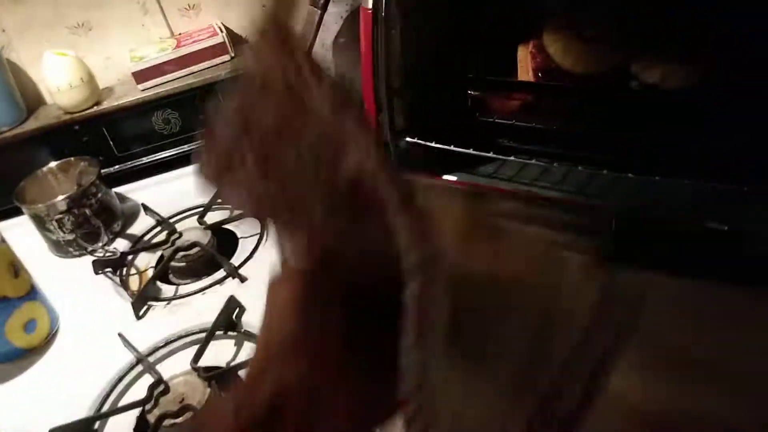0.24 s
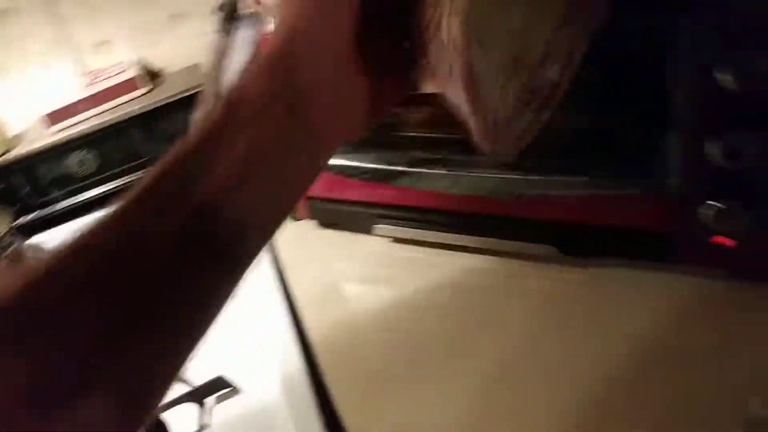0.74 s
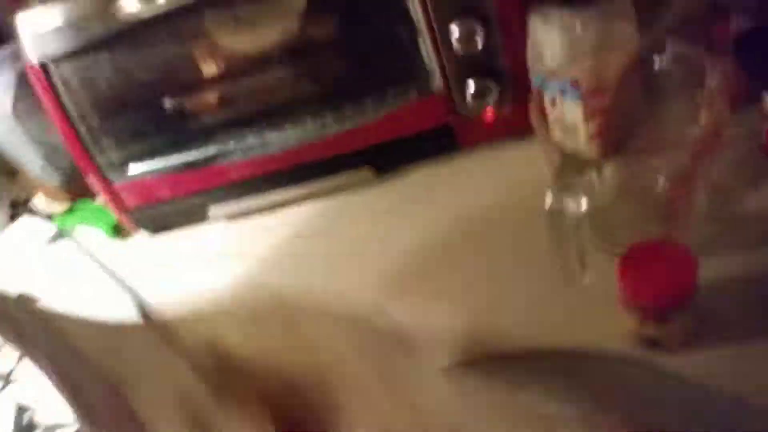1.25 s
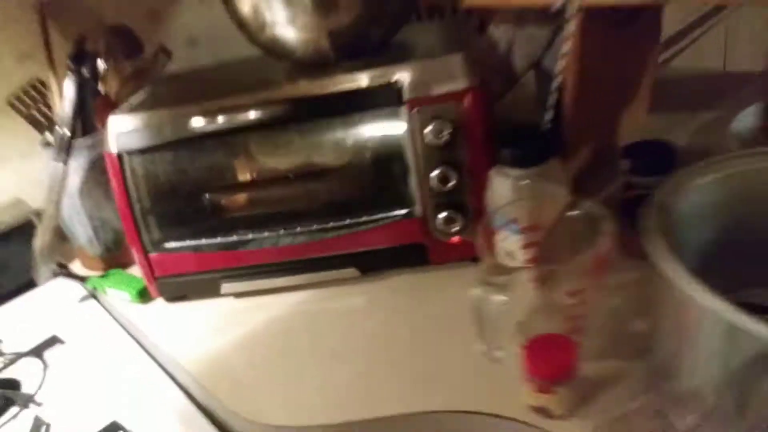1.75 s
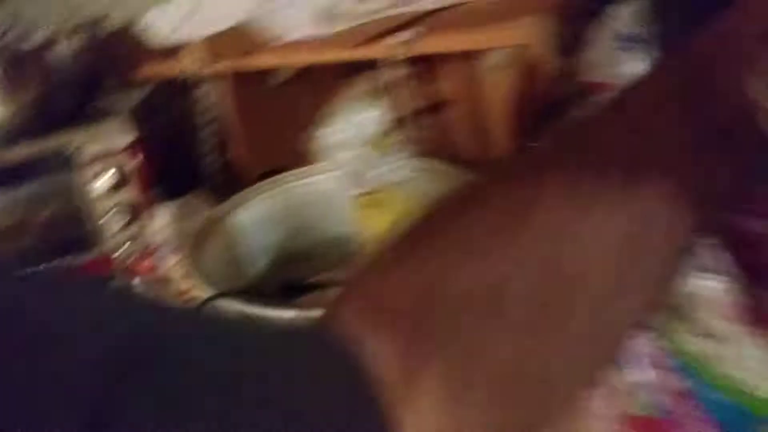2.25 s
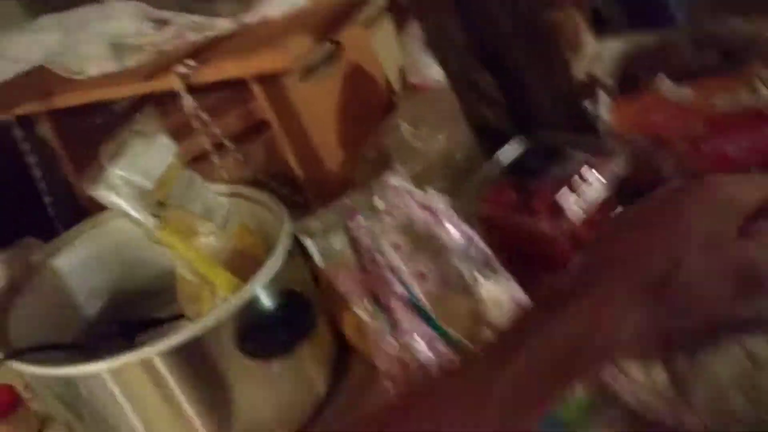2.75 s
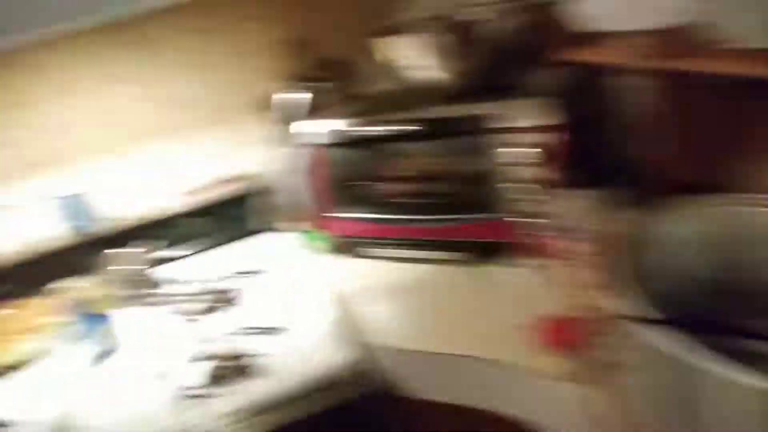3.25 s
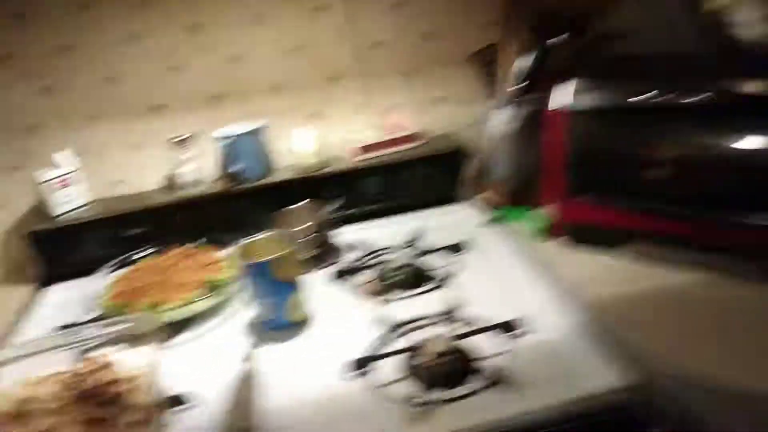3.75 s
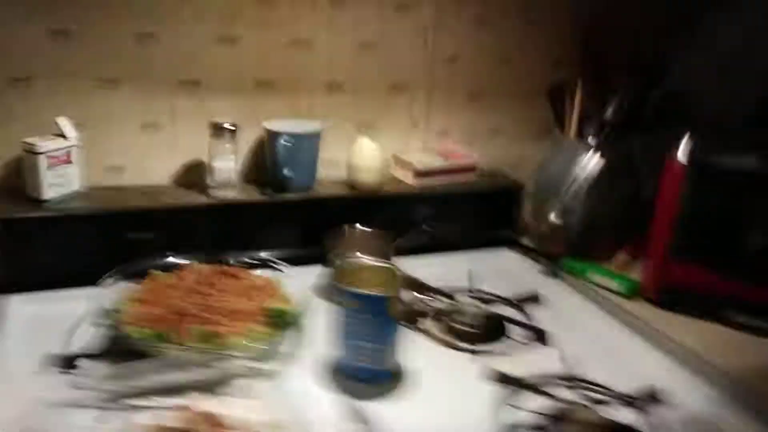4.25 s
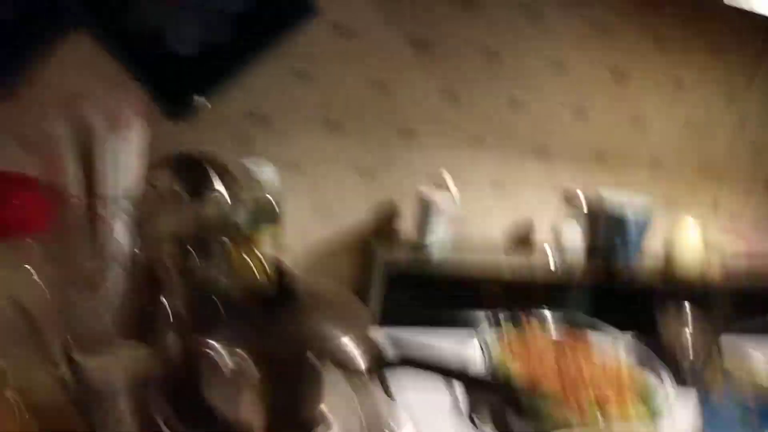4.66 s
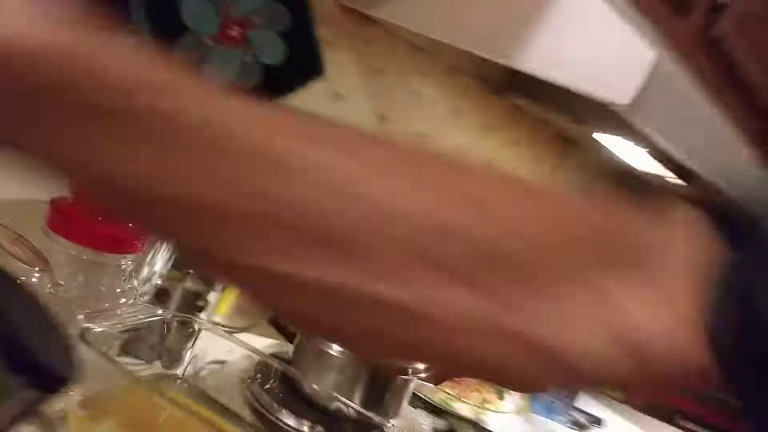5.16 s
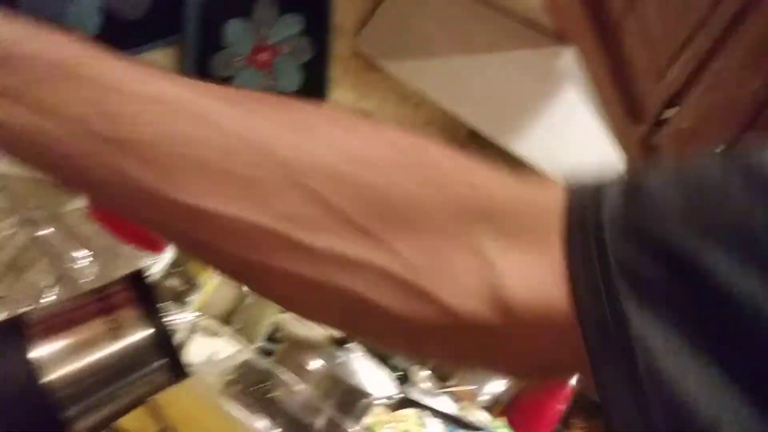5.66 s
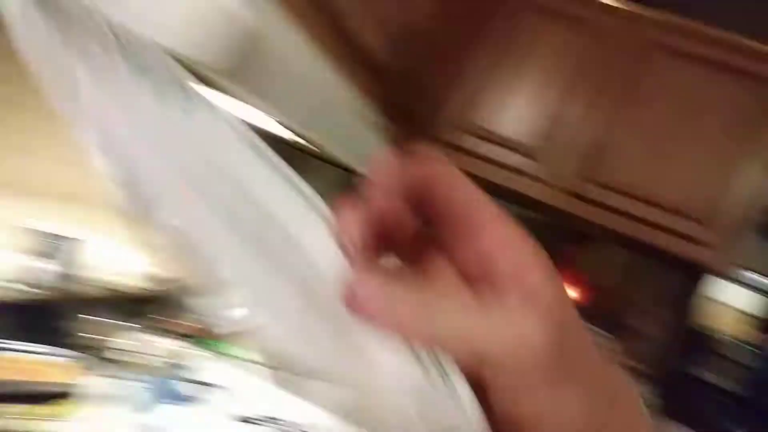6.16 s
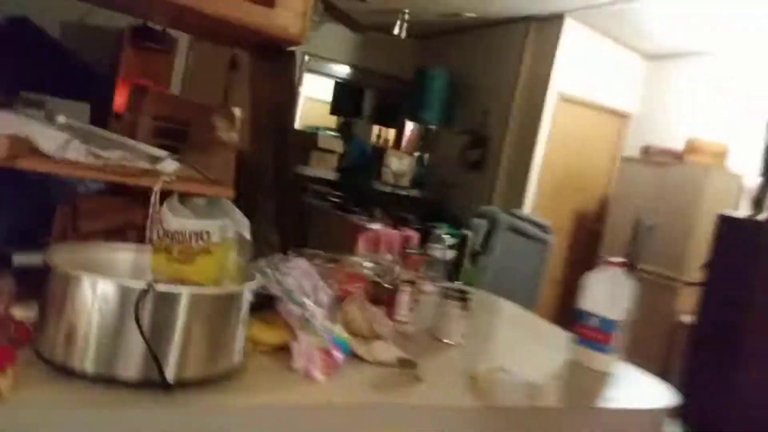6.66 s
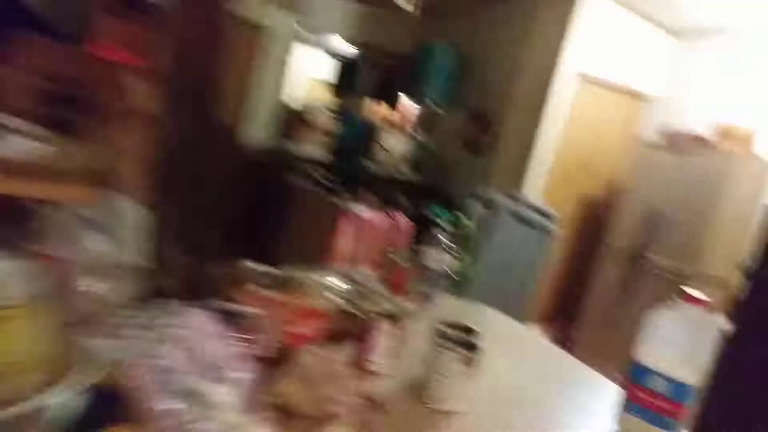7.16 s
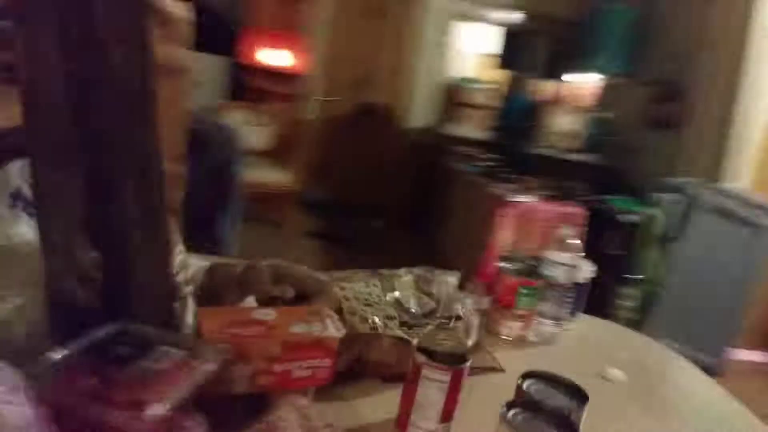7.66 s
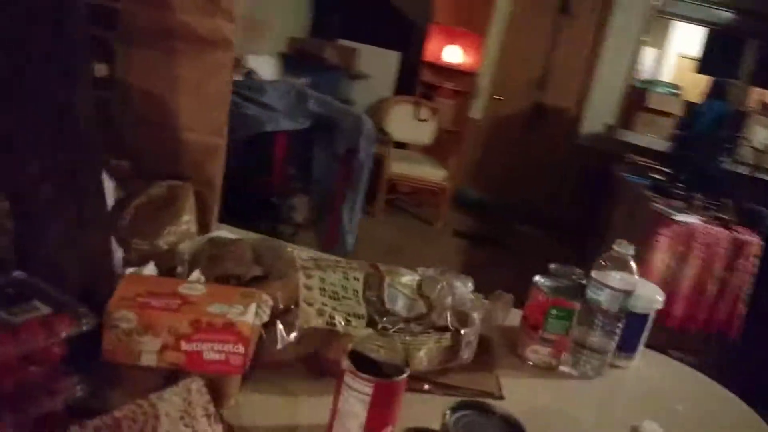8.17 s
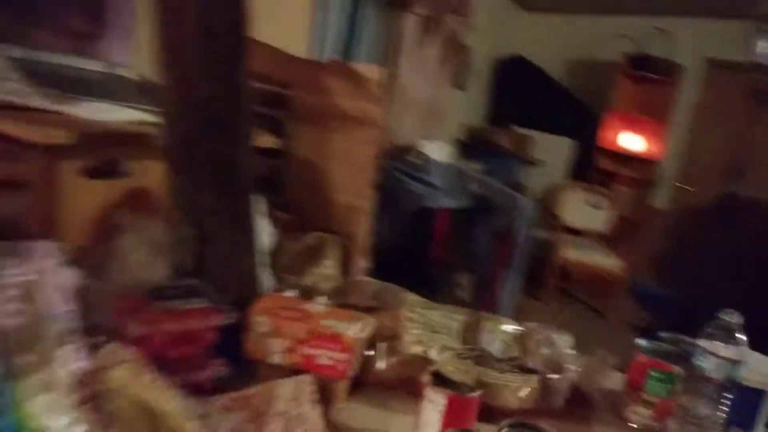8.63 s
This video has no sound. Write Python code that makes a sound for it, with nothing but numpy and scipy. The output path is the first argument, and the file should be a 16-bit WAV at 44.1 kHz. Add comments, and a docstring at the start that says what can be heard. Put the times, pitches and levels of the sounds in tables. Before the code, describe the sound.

A pan scrapes an oven rack, the metal door squeaks and slams, a timer ticks, then a plate is lifted, set down hard and rocks to rest.

```python
"""A small kitchen, heard from a hand-held phone: noise bursts, fading sine modes and a diffuse room echo.
A pan scrapes on a toaster oven's rack, the door squeaks and slams, and the clockwork timer beats in clicks.
Things knock on the counter and two faint low footsteps fall; a plate is slid off a stack, set down hard
and rocks to rest in rows of contacts. Tiny random clicks make the slide, the cloth brushing the phone
and a tap that starts to hiss near the end."""
import sys
import numpy as np
from scipy import signal
from scipy.fft import rfft, irfft
from scipy.io import wavfile

SR = 44100
rng = np.random.default_rng(int(sys.argv[2]) if len(sys.argv) > 2 else 0)


def output_pcm(signal):
    """Save a mono or channel-first signal as 16-bit PCM at the path in sys.argv[1].

    Samples are clipped to [-1, 1] before scaling.
    """
    pcm = np.clip(np.atleast_2d(signal).T, -1, 1) * 32767
    wavfile.write(sys.argv[1], SR, np.round(pcm).astype(np.int16))


N = 392490
TIME = np.arange(N) / SR

# Contacts. Each row: start in seconds, relative level in dB, brightness in dB per octave, decay t60 in seconds.
# The pan bumps onto the oven rack.
PAN_BUMPS = [(.1995, -33.5, -1.5, .06), (.205, -29.5, -7, .06), (.2295, -29, 0, .075), (.238, -35, .5, .05),
             (.27, -35, -2, .04)]
# The oven door slams (one row).
DOOR_SLAM = (.8073, -8.3, .5, .058)
# The plate meets the stack as it is lifted off.
STACK_BLOWS = [(5.4835, -45, -1.5, .033), (5.503, -35.5, 1, .21), (5.5622, -18, 2.5, .065),
               (5.6595, -17, 1.3, .095), (5.781, -48, 0, .03), (5.918, -55, 1, .02), (5.929, -50, 1, .011),
               (6.081, -55, 1, .016)]
# The plate lands flat (one row).
LANDING = (7.815, -9.3, .3, .036)
# It comes down again after its first hop (one row).
FIRST_REBOUND = (7.8495, -16.3, 0, .06)
# Its last rock, which runs out in ever quicker bounces (one row).
LAST_ROCK = (8.501, -13.5, -1.5, .105)
# Hard knocks on the counter.
KNOCKS = [(2.433, -51.5, 7.5, .015), (2.574, -20.5, -.5, .033), (2.589, -29.5, 2.5, .041),
          (2.602, -32, -2, .085), (7.017, -54, -10, .051)]
# Soft thumps: two faint low footsteps, then soft bumps on the counter.
THUMPS = [(4.44, -66, -8, 0.11), (4.85, -60, -12, 0.075), (5.096, -40, 1.5, 0.14),
          (8.85, -37.5, -7.5, 0.054), (8.87, -25, -5, 0.06), (8.884, -27.5, -5, 0.014)]
# The timer as the phone moves about the room, crisp when near and smeared when far; beats read between rows.
TIMER_HEARD = [(0, -35, -1, .09), (1.1, -36.5, -2, .08), (1.4, -43, -2, .11), (2.2, -49.5, -2, .19),
               (3, -49, -.5, .16), (3.8, -44.5, 0, .15), (4.7, -47, 2, .17), (5.05, -53.5, 4, .14),
               (6, -58, 3, .12), (6.8, -52.5, 4, .12), (7.6, -56, 2, .12)]

# Contacts. Each row: start in seconds, relative level in dB, brightness in dB per octave.
# Light pings of the plate's rim, and one short singing tone as it slides (the third row).
RIM_PINGS = [(5.4835, -39, -4.5), (5.503, -42, 1), (5.628, -39.5, -12), (6.335, -63, 1), (6.365, -61, 2),
             (6.39, -57.5, 2)]
# The plate rocks from rim to rim.
ROCKS = [(8.101, -28, -5), (8.1095, -13, -.2), (8.1865, -20.5, -2), (8.1935, -16, -1), (8.249, -24, 3),
         (8.2625, -15.5, -3.5), (8.3325, -14.5, -1), (8.3905, -18.5, -1.5), (8.453, -11.5, -1)]
# A jar touches down.
JAR_THUDS = [(2.53, -31.5, 4)]
# Contacts of every rock, as the rim drops and chatters.
# Each row: nominal lag in seconds, added level in dB, added brightness in dB per octave.
ROCK_CHATTER = [(0, 0, 0), (.007, -5.5, -2), (.025, -9, -2)]

# Clear ringing modes. Each row: frequency in Hz, relative level in dB, decay t60 in seconds.
# Sheet metal of the oven and pan.
OVEN_MODES = [(228, -13, 1.1), (296, -9, 1.9), (425, -6, .6), (592, -11, 1.7), (888, -11, 1.6),
              (964, -7, .9), (1540, -9, .8), (1685, -13, 1.0), (1790, -8, .6), (1970, -11, 1.2),
              (2180, -4, .9), (2250, 0, 1.3), (2300, -4, .5), (2390, -10, 1.1), (2506, -5, .5),
              (2659, -13, 1.0), (2988, -14, .9), (4042, -10, .5), (4678, -14, .8)]
# The plate held in the hand.
HELD_PLATE_MODES = [(458, -5, .12), (565, -5, .13), (790, -6, .13), (996, -7, .16), (1130, -7, .1),
                    (1985, -4, .15), (2740, -14, .1), (3413, 0, .15), (4576, -8, .08), (4710, -3, .08),
                    (5230, -5, .07), (5580, -1, .07), (5814, -3, .09), (6240, -4, .08), (6770, -6, .09),
                    (7090, -3, .06), (7870, -8, .08), (8210, -9, .08), (9100, -8, .06), (10170, -12, .07),
                    (12220, -16, .07)]
# The rim of the lifted plate.
RIM_MODES = [(2000, -2, .14), (3430, -1, .13), (4400, -5, .08), (5100, -6, .08), (5950, -2, .1),
             (6320, -5, .14), (6800, -4, .14), (9000, -7, .1), (10300, -13, .08)]
# The plate as it lands flat.
LANDED_PLATE_MODES = [(520, -6, .2), (585, -5, .25), (646, -11, .35), (904, -7, .3), (942, -7, .25),
                      (1050, 1, .22), (1147, -4, .25), (1287, -4, .3), (1550, -5, .22), (1620, -9, .25),
                      (1787, -2, .24), (1873, -6, .22), (1980, -1, .24), (2094, -9, .25), (3386, -14, .18),
                      (3440, -11, .17), (4221, -24, .25), (5545, -22, .25), (5825, -16, .27),
                      (6277, -27, .3), (6799, -17, .17), (8285, -32, .25), (9050, -30, .12),
                      (10800, -32, .09)]
# The plate as it rocks.
ROCKING_MODES = [(463, -4, .15), (545, -5, .15), (606, 0, .2), (668, -1, .2), (797, -4, .17),
                 (840, -3, .17), (1071, -6, .17), (1200, -5, .16), (1287, -18, 1.2), (1700, -9, .15),
                 (2094, -4, .26), (3300, -11, .09), (3700, -8, .1), (5880, -3, .09), (6020, -3, .08),
                 (6325, -5, .1), (6799, -5, .11), (7930, -16, .1), (8290, -20, .08), (9070, -15, .11),
                 (9650, -22, .07), (10200, -15, .08), (10800, -25, .08), (12300, -22, .07),
                 (12600, -21, .07), (13000, -25, .07)]
# The worktop under a knock.
COUNTER_MODES = [(560, -7, .05), (930, -6, .05), (1520, -3, .06), (1760, -3, .07), (2290, 0, .11),
                 (2430, -8, .06)]
# The hollow jar.
JAR_MODES = [(410, -5, 0.04), (485, 1, 0.085), (624, -9, .05), (960, -11, 0.026), (1630, -21, 0.03),
             (2000, -21, .025)]
# The timer's ticking parts.
TICK_MODES = [(3220, -9, .04), (4450, -4.5, .05), (4870, -1, 0.061), (5280, -2.5, 0.044),
              (6500, -11.5, 0.024), (7100, -15, .04)]

# Colours of crowded, quickly damped modes and of steady sounds. Each row: frequency in Hz, relative level in dB.
# Oven and pan blows.
OVEN_COLOUR = [(35, -79), (60, -53.5), (294, -8), (363, -7), (408, -4), (448, -9.5), (715, -6.5),
               (903, -11), (1010, -5), (1380, -9), (1470, -2), (2520, -2.5), (3500, -12), (5090, -7),
               (16000, -53)]
# Pan scraping on the rack.
RACK_COLOUR = [(60, -64.5), (150, -26), (250, 3.5), (340, 2), (450, -14.5), (1150, -14.5), (1950, 4),
               (2600, 4), (3500, -18.5), (4300, -4), (5600, -1.5), (7500, -14.5), (16000, -43)]
# Plate against the stack, both clinks and grit.
STACK_COLOUR = [(35, -77), (60, -53.5), (408, -39.5), (448, -3), (492, 5), (540, -4.5), (1110, .5),
                (1250, -8), (1950, -5.5), (2140, -11), (4220, -8.5), (4640, -3), (10000, -22), (16000, -33)]
# Plate landing.
LANDING_COLOUR = [(35, -90), (60, -50), (363, -15), (417, -15.5), (458, -13), (579, -4.5), (767, -10),
                  (1040, -1.5), (2000, -8.5), (2900, -24), (3420, -18.5), (4860, -31), (6900, -26),
                  (7400, -40), (16000, -71)]
# Plate rocking.
ROCKING_COLOUR = [(35, -87.5), (60, -77), (250, -25.5), (287, -27.5), (371, -14), (593, -2.5),
                  (1820, -11.5), (2140, -13), (2650, -23.5), (3760, -15.5), (5460, -23), (6000, -13),
                  (7400, -38), (9350, -45), (16000, -68)]
# Counter knocks.
KNOCK_COLOUR = [(47, -72), (80, -47), (515, -11.5), (1000, -9), (1310, -18), (1430, -3), (1740, -13),
                (1900, -19), (2270, -8), (2840, -21), (4940, -27.5), (9400, -47.5), (16000, -55)]
# Footsteps and soft bumps.
THUMP_COLOUR = [(35, -85), (70, -35), (150, -22), (250, -3), (500, 0), (1000, 1), (1500, -16), (2200, -31),
                (5000, -36.5), (15000, -49)]
# Timer beats.
TICK_COLOUR = [(60, -68), (300, -32), (900, -17.5), (2200, -5.5), (3800, -9.5), (4800, 0), (5600, -3.5),
               (7500, -18.5), (10000, -25), (15000, -31.5)]
# Tap spray.
TAP_COLOUR = [(59, -84), (100, -52), (206, -18.5), (547, -16), (621, 2), (705, -18), (752, -4.5),
              (1170, -4), (1250, 2), (1550, -5.5), (2270, -2), (3470, -10), (5650, -4), (16000, -36.5)]
# Cloth brushing past.
SLEEVE_COLOUR = [(60, -52), (200, -9), (1000, 0), (3000, -2.5), (5500, -1.5), (8000, -9.5), (15000, -25)]
# Room air.
AIR_COLOUR = [(24, -57), (40, -35), (176, -20), (209, -3.5), (262, -6), (283, -12.5), (372, 3), (663, 0.5),
              (990, 1.5), (1120, -1), (2050, -4.5), (3140, -15), (4570, -13), (6170, -20), (16000, -32)]

# Friction and flow. Each row: start, attack, hold and release t60 in seconds, gain in dB.
# Pan on the rack (one row).
RACK_SCRAPE = (.226, .006, .016, .4, -33.5)
# Door hinge (one row).
HINGE_SQUEAK = (.724, .008, .025, .35, -49)
# Plate over the plate below (one row).
PLATE_SLIDE = (5.49, .02, .18, .17, -45)
# Tap (one row).
TAP_FLOW = (8.4, .23, .18, 1.5, -39.3)
# Cloth past the phone.
SLEEVE_RUSTLES = [(2.08, .09, .29, .2, -64.5), (4.62, .1, .09, .25, -53.5)]
# Room air. Each row: time in seconds, level of the low band in dB, level of the hiss in dB.
AIR = [(0, -61.5, -62.5), (1.5, -61, -64), (2.3, -62.5, -61), (2.85, -64, -66), (3.9, -60.5, -60.5),
       (5.4, -61, -67), (6.2, -63.5, -67), (7.7, -59, -63), (8.9, -58, -66)]

OVEN_RING_DB = -30.5  # clear modes against the blows
RACK_JUDDER_DB = 3.5  # unevenness of the scrape
SQUEAK_HZ, SQUEAK_WAVER = 3310, .02  # centre pitch; random share of it
ROCK_T60_S, CHATTER_SPREAD = .07, .12  # decay of a contact; share by which its lag varies from rock to rock
FIRST_TICK_S, TICK_TOCK_S, TOCK_LAG_S = .1160, .5124, .2515  # first beat, one tick-tock, tock after tick
TOCK_DB = -1  # the tock against the tick
HUM_HZ, HUM_DB = 296, -78  # hum pitch; level about which it wanders
AIR_WAVER_DB = .7
CEILING, TOP_HZ = .72, 16000  # the phone's peak limit and upper cutoff


def oven(shimmer_db=-28, shimmer_t60=1.6, crack=6, size=62000):
    """Sheet-metal door and pan: clattering blows, a dense ringing tail, the scrape on the rack and the hinge."""
    slam = bounces(DOOR_SLAM, gap_s=.0187, loss_db=3.8, keep=.8, dulling_db=.1, count=5)
    hits = PAN_BUMPS + slam
    clatter = blows(hits, OVEN_COLOUR, crack) + rings(hits, OVEN_MODES, OVEN_RING_DB, size=size)
    panels = rng.standard_normal(size) * fade(np.arange(size) / SR, shimmer_t60)
    panels /= np.sqrt(np.sum(panels ** 2))
    shimmer = undb(shimmer_db) * signal.oaconvolve(clatter, panels)[:N]
    rubbing = unit(shape(slips(rate=2300, spread_db=3), RACK_COLOUR))
    scrape = rubbing * undb(RACK_JUDDER_DB * walk(160)) * swell(*RACK_SCRAPE)
    return clatter + shimmer + scrape + hinge(SQUEAK_HZ, SQUEAK_WAVER)


def hinge(pitch_hz, waver):
    """A thin stick-slip squeak: one sine of unsteady pitch and level."""
    phase = 2 * np.pi * np.cumsum(pitch_hz * (1 + waver * walk(700))) / SR
    return unit(np.sin(phase) * undb(3 * walk(150))) * swell(*HINGE_SQUEAK)


def plate_landing(ring_db=-8.5, body_db=0, crack=14):
    """The plate lands flat and chatters on the hard surface in ever shorter hops."""
    hits = [LANDING] + bounces(FIRST_REBOUND, gap_s=.021, loss_db=2.6, keep=.7, dulling_db=-.3, count=5)
    return undb(body_db) * blows(hits, LANDING_COLOUR, crack) + rings(hits, LANDED_PLATE_MODES, ring_db)


def plate_rocking(ring_db=-9, body_db=-1.2, crack=9):
    """Let go, it rocks from rim to rim, each rock a few contacts, and runs out in quickening bounces."""
    stretch = 1 + CHATTER_SPREAD * rng.standard_normal((len(ROCKS), len(ROCK_CHATTER)))
    hits = []
    for (s, db, tilt), lag_shares in zip(ROCKS, stretch):
        for (lag, softer, duller), share in zip(ROCK_CHATTER, lag_shares):
            hits.append((s + lag * share, db + softer, tilt + duller, ROCK_T60_S))
    hits += bounces(LAST_ROCK, gap_s=.027, loss_db=1.9, keep=.8, dulling_db=.4, count=6)
    body = undb(body_db) * blows(hits, ROCKING_COLOUR, crack)
    return body + rings(hits, ROCKING_MODES, ring_db, size=26000)


def plate_lifted(ring_db=-6.5, body_db=-2.3, crack=6, grit_db=-4, rim_db=0, size=8000):
    """The plate slides over the one below, singing in its modes, clinks against it, and its rim pings faintly."""
    body = undb(body_db) * blows(STACK_BLOWS, STACK_COLOUR, crack)
    clinks = body + rings(STACK_BLOWS, HELD_PLATE_MODES, ring_db)
    grit = slips(rate=1900, spread_db=3)
    plate_response = partials(HELD_PLATE_MODES, np.arange(size) / SR).sum(axis=0)
    singing = signal.oaconvolve(grit, plate_response)[:N]
    rubbing = undb(grit_db) * unit(shape(grit, STACK_COLOUR))
    slide = (unit(singing) + rubbing) * swell(*PLATE_SLIDE)
    return clinks + radiate(slide) + rings(RIM_PINGS, RIM_MODES, rim_db)


def counter_and_footsteps(ring_db=-9.5, jar_db=-.5):
    """Knocks ring the worktop; footsteps and soft bumps are damped thumps; a hollow jar is heard by its modes."""
    knocks = blows(KNOCKS, KNOCK_COLOUR, crack=8) + rings(KNOCKS, COUNTER_MODES, ring_db)
    thumps = blows(THUMPS, THUMP_COLOUR, crack=7.5)
    return knocks + thumps + rings(JAR_THUDS, JAR_MODES, jar_db)


def timer(level_db=-2, ring_db=-6, count=15):
    """The escapement of the oven timer, about four beats a second: a tick, then a slightly softer tock."""
    s, db, tilt, t60 = np.transpose(TIMER_HEARD)
    hits = []
    for k in range(count):
        for lag, accent_db in ((0, 0), (TOCK_LAG_S, TOCK_DB)):
            at = FIRST_TICK_S + k * TICK_TOCK_S + lag
            hits.append((at, np.interp(at, s, db) + accent_db, np.interp(at, s, tilt), np.interp(at, s, t60)))
    clicks = undb(level_db) * blows(hits, TICK_COLOUR, crack=2)
    return clicks + rings(hits, TICK_MODES, ring_db, size=4000)


def tap():
    """A fine spray of countless drops, each a tiny click."""
    return unit(shape(slips(rate=18000, spread_db=-1.5), TAP_COLOUR)) * swell(*TAP_FLOW)


def sleeve():
    """Cloth brushes past the phone: dense small slips, swelling and dying away."""
    cloth = unit(shape(slips(rate=3100, spread_db=2), SLEEVE_COLOUR))
    return cloth * sum(swell(*rustle) for rustle in SLEEVE_RUSTLES)


def air(split_hz=2500):
    """Room noise whose hiss changes as the phone turns; a faint appliance hum wanders with the standing waves."""
    s, level_db, hiss_db = np.transpose(AIR)
    noise = shape(rng.standard_normal(N), AIR_COLOUR)
    out = undb(HUM_DB + 3.5 * walk(1.5)) * unit(np.sin(2 * np.pi * HUM_HZ * TIME))
    for side, db in (("low", level_db), ("high", hiss_db)):
        band = signal.sosfilt(signal.butter(3, split_hz, side, fs=SR, output="sos"), noise)
        out = out + unit(band) * undb(np.interp(TIME, s, db) + AIR_WAVER_DB * walk(14))
    return out


def kitchen(x, low_t60=0.44, mid_t60=0.35, high_t60=0.22, build_s=0.011, size=30000):
    """Diffuse echo of cupboards and walls: noise that builds up and decays; the treble dies first."""
    t = np.arange(size) / SR
    hz = np.arange(size // 2 + 1) * SR / size
    noise, response = rfft(rng.standard_normal(size)), 0
    for lo, hi, t60 in ((0, 600, low_t60), (595, 4000, mid_t60), (3870, SR, high_t60)):
        response = response + irfft(noise * (hz >= lo) * (hz < hi)) * fade(t, t60)
    response *= np.minimum(t / build_s, 1) ** 2
    return signal.oaconvolve(x, response / np.sqrt(np.sum(response ** 2)))[:N]


def blows(table, colour, crack, size=12000):
    """Each contact gives a crack and a burst of crowded modes that die quickly."""
    out, t = np.zeros(N), np.arange(size) / SR
    for s, db, tilt, t60 in table:
        burst = rng.standard_normal(size) * fade(t, t60)
        burst[0] += crack
        add(out, s, undb(db) * attack_unit(shape(burst, colour, tilt)))
    return out


def rings(table, modes, ring_db, size=14000):
    """Contacts ring the clear modes; each meets another spot, so their mix and tuning shift a little."""
    out, t = np.zeros(N), np.arange(size) / SR
    hz, _, t60 = np.transpose(modes)
    give = .0007 / t60  # the modes that the support damps most are also detuned most by it
    ending = np.minimum(4 * (1 - t / t[-1]), 1)  # the last quarter ramps to silence
    for s, db, tilt, *_ in table:
        side, level, tuning = rng.standard_normal((3, len(modes)))
        spot = np.sign(side) * undb(2.5 * level + tilt * np.log2(hz / 1500))
        ringing = spot @ partials(modes, t, (give * tuning)[:, None])
        add(out, s, undb(db + ring_db) * attack_unit(ringing) * ending)
    return radiate(out)


def bounces(blow, gap_s, loss_db, keep=1, dulling_db=0, count=2):
    """A blow and its rebounds: each is weaker, its tilt shifts, and each gap keeps a share of the one before."""
    s, db, tilt, t60 = blow
    hits = []
    for k in range(count):
        at = s + gap_s * np.sum(keep ** np.arange(k))
        hits.append((at, db - k * loss_db, tilt - k * dulling_db, t60))
    return hits


def slips(rate, spread_db):
    """Tiny random clicks of uneven size, at a mean rate per second."""
    clicks = (rng.random(N) < rate / SR) * rng.standard_normal(N)
    return unit(clicks * undb(spread_db * rng.standard_normal(N)))


def partials(modes, t, detune=0):
    """One fading sine for each mode."""
    hz, db, t60 = np.transpose(modes)[:, :, None]
    return undb(db) * np.sin(2 * np.pi * hz * (1 + detune) * t) * fade(t, t60)


def shape(x, colour, tilt=0, size=2048):
    """Causal minimum-phase filter with a (Hz, dB) colour, tilted in dB per octave about 1.5 kHz."""
    hz, db = np.transpose(colour)
    octave = np.log2(np.maximum(np.arange(size // 2 + 1) * SR / size, 20))
    gain_db = np.interp(octave, np.log2(hz), db) + tilt * np.clip(octave - np.log2(1500), -3, 3)
    # Folding the cepstrum forward puts the filter's energy as early as it can be.
    cepstrum = irfft(np.log(undb(gain_db)))
    cepstrum[1:size // 2] *= 2
    cepstrum[size // 2 + 1:] = 0
    return signal.oaconvolve(x, irfft(np.exp(rfft(cepstrum))))[:len(x)]


def radiate(x):
    """Small things give off almost no bass: a high-pass at 200 Hz."""
    return signal.sosfilt(signal.butter(4, 200, "high", fs=SR, output="sos"), x)


def swell(start_s, attack_s, hold_s, release_s, db):
    """Gain that rises, holds and dies away."""
    t = TIME - start_s
    return undb(db) * np.clip(t / attack_s, 0, 1) * fade(np.maximum(t - attack_s - hold_s, 0), release_s)


def fade(t, t60):
    """Exponential decay, 60 dB in t60 seconds (at least 2 ms)."""
    return np.exp(-np.log(1000) * t / np.maximum(t60, .002))


def walk(rate):
    """Random values with a spread near 1, joined by straight lines, at a rate per second."""
    steps = rng.standard_normal(N // 64)
    return np.interp(TIME * rate, np.arange(len(steps)), steps)


def undb(db):
    """Decibels to gain."""
    return 10 ** (np.asarray(db) / 20)


def unit(x):
    """Scale to rms 1."""
    return x / np.sqrt(np.mean(x ** 2))


def attack_unit(x):
    """Scale to rms 1 over the first 6 ms."""
    return x / np.sqrt(np.mean(x[:int(.006 * SR)] ** 2))


def add(track, start_s, sound):
    """Mix a sound into a track."""
    i = int(start_s * SR)
    track[i:i + len(sound)] += sound[:N - i]


def scene():
    """Oven, plate, counter, footsteps and timer with shares of room echo; cloth, tap and air without."""
    sources = [(oven(), undb(-6.5)), (plate_landing(), undb(-10)), (plate_rocking(), undb(-11)),
               (plate_lifted(), undb(-14)), (counter_and_footsteps(), undb(-12)), (timer(), undb(-8.5))]
    direct = sum(sound for sound, _ in sources)
    echo = kitchen(sum(sound * share for sound, share in sources))
    return (direct + echo + tap() + sleeve() + air())[None]


def record(dry):
    """The phone rounds off the loudest peaks and cuts the top."""
    rounded = dry / (1 + (dry / CEILING) ** 6) ** (1 / 6)
    return signal.sosfilt(signal.ellip(8, .2, 70, TOP_HZ, fs=SR, output="sos"), rounded)


dry = scene()
out = record(dry)
output_pcm(out)
```